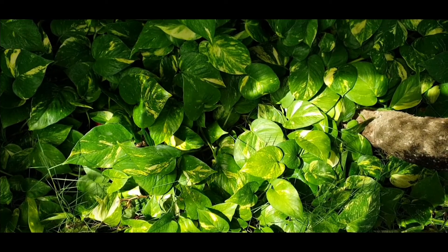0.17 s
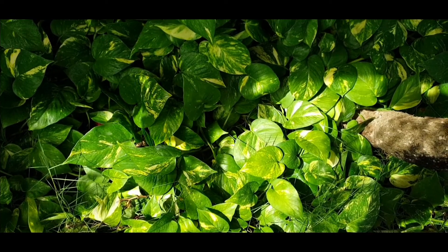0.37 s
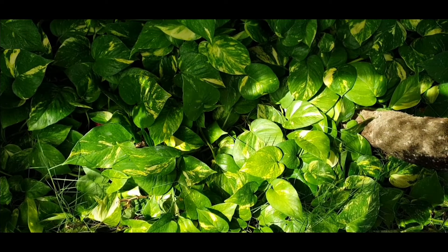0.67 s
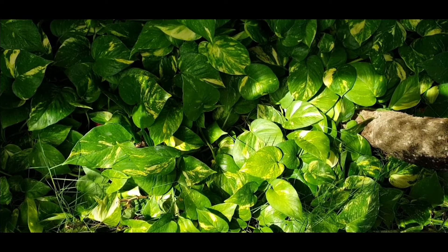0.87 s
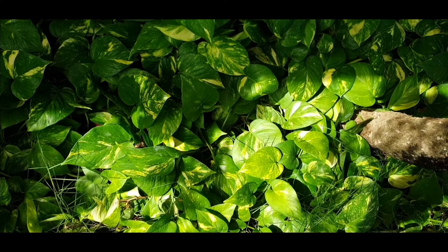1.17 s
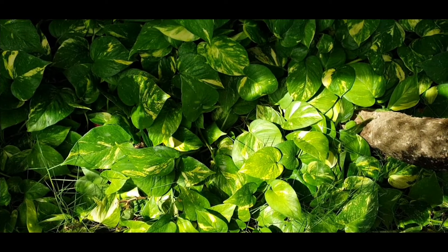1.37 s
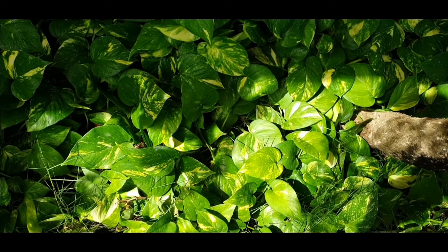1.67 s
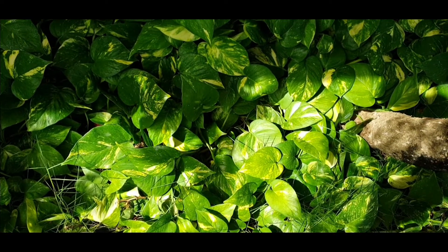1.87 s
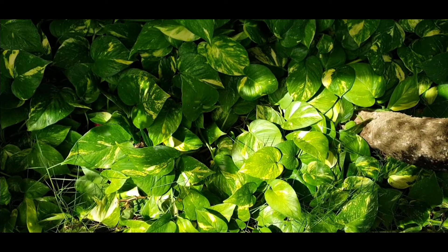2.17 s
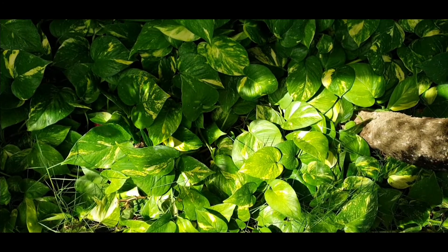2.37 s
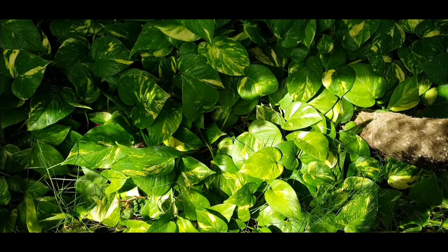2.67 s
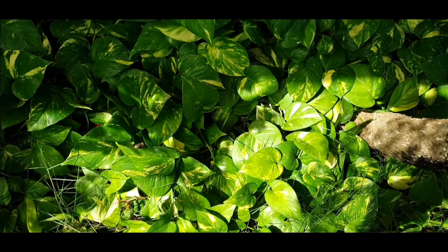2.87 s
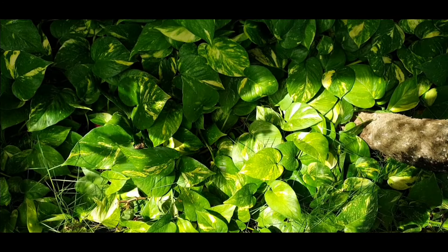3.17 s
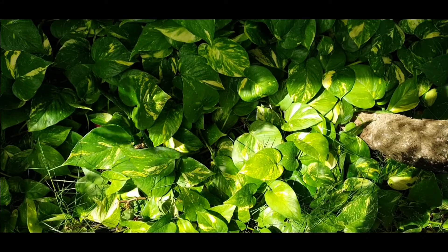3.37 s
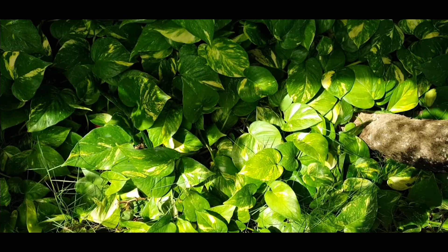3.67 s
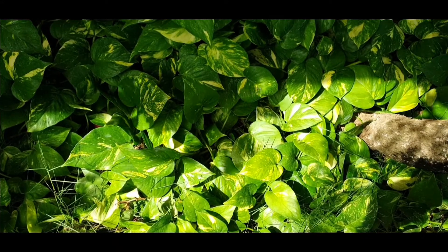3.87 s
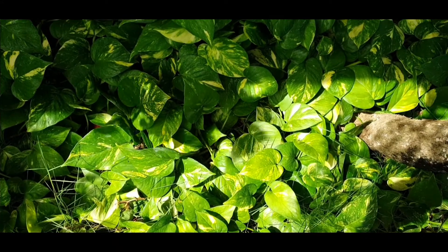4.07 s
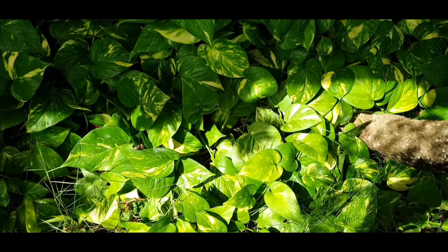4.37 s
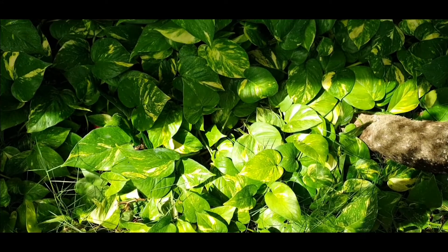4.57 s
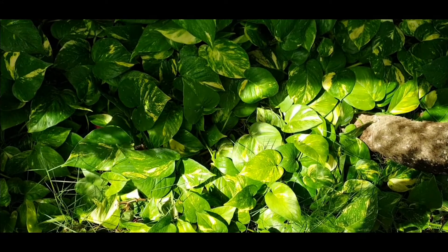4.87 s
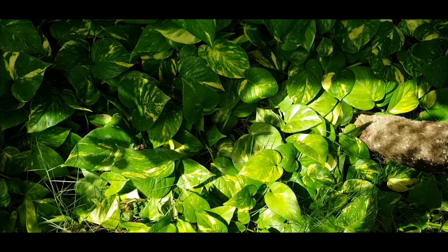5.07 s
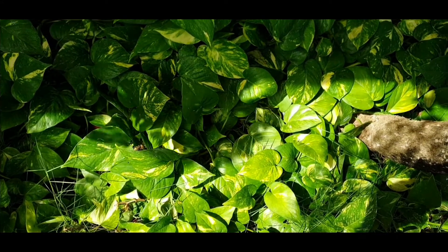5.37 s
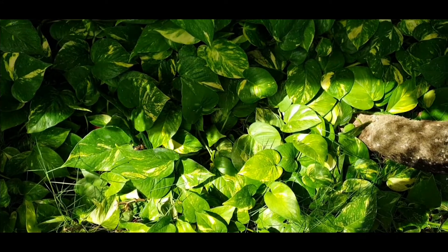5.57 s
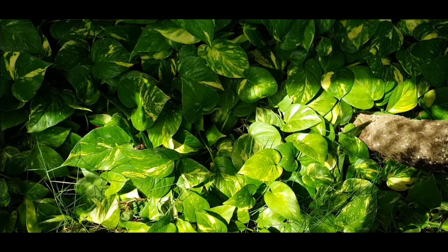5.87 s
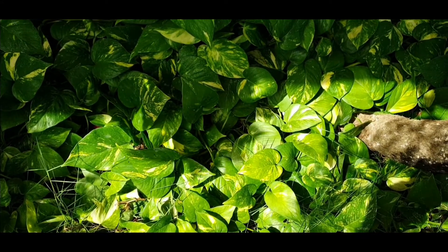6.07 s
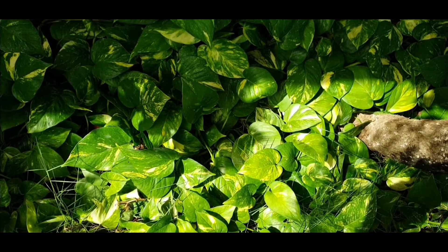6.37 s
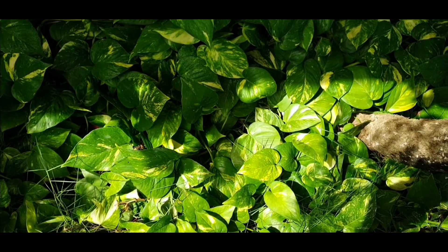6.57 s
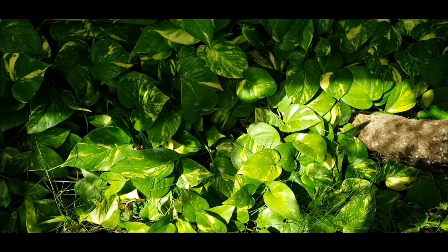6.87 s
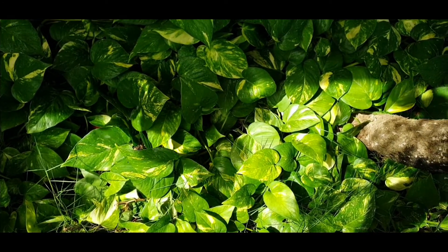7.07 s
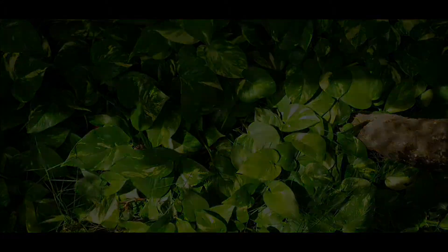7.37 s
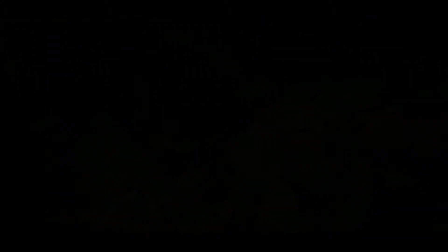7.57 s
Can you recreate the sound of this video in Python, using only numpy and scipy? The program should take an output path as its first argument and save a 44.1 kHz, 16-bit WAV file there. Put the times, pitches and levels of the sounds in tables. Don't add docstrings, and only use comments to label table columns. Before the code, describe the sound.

Close stereo phone pickup in a garden: dense, crisp rustling of broad leaves swells for two seconds, then eases. Far traffic rumbles softly underneath. Sparse small birds whistle, pipe, buzz and twitter among the trees. Wind thumps the left side, lightly at first, then in two heavy bursts with a hard slap just after five seconds, dying away before an abrupt stop.

```python
import sys
import numpy as np
from scipy import signal
from scipy.fft import rfft, irfft, next_fast_len
from scipy.io import wavfile
from scipy.ndimage import uniform_filter1d

SR = 44100
rng = np.random.default_rng(int(sys.argv[2]) if len(sys.argv) > 2 else 0)


def gain_from_decibels(decibels):
    exponent = np.asarray(decibels, float) / 20
    return 10 ** exponent


def bounce(signal):
    frames = np.transpose(np.atleast_2d(signal))
    limited = np.clip(frames, -1, 1)
    pcm = np.round(limited * 32767).astype(np.int16)
    wavfile.write(sys.argv[1], SR, pcm)


N = 340452
T, SIZE = np.arange(N) / SR, next_fast_len(N)
HZ = np.arange(SIZE // 2 + 1) * SR / SIZE + 1
PORT_LAG = 10


def rms_one(x):
    return x / np.sqrt(np.mean(x ** 2))


def spectrum(table):
    hz, value = np.transpose(table)
    return np.interp(np.log(HZ), np.log(hz), value)


def band(x, lo_hz, hi_hz, order=2):
    return signal.sosfilt(signal.butter(order, [lo_hz, hi_hz], "band", fs=SR, output="sos"), x)


def walk(rate_hz):
    hold = max(int(SR / rate_hz), 2)
    held = rng.standard_normal(512)[np.arange(N) // hold % 512]
    return 1.2 * uniform_filter1d(uniform_filter1d(held, hold), hold)


# frequency in Hz, share of the sound common to both (0-1).
COMMON = [(60, 1), (200, 0.9), (400, 1), (700, 0.56), (1000, 0.39), (1900, 0.07), (2600, 0.37),
          (6000, 0.07), (15000, 0.01)]


def two_ports(sources):
    common, left, right = rfft(sources)
    share = np.clip(spectrum(COMMON), 0, 1)
    late = np.exp(-2j * np.pi * HZ * PORT_LAG / SR)
    shared = np.array([common, late * common])
    private = np.array([left, right])
    return np.sqrt(share) * shared + np.sqrt(1 - share) * private


def wavering(spectra, centres_hz, shared_db, own_db, own_rate_hz):
    out = 0
    for k in range(len(centres_hz)):
        this_band = np.arange(len(centres_hz)) == k
        weight = np.interp(np.log(HZ), np.log(centres_hz), this_band)
        level_db = shared_db[k] + own_db * walk(own_rate_hz)
        out = out + gain_from_decibels(level_db) * irfft(spectra * weight, SIZE)[:, :N]
    return out


def draught():
    creep = rms_one(band(rng.standard_normal((2, N)), 27, 77))
    return creep * gain_from_decibels(-55.5 + 3.0 * np.array([walk(6), walk(25.0)]))


# frequency in Hz, level in dB per Hz.
RUMBLE = [(15, -65), (25, -26), (50, -2), (70, 4), (124, 2), (149, -6.5), (233, -5), (335, -10.5),
          (415, -10.5), (649, -11), (717, -9), (998, -21.5), (1300, -13.5), (1690, -46), (2860, -120)]


def rumble():
    far_db, follow = -62, 0.81
    spectra = two_ports(rng.standard_normal((3, SIZE))) * gain_from_decibels(spectrum(RUMBLE))
    centres_hz = 30 * 2.0 ** np.arange(7)
    breeze_db = np.interp(T, *np.transpose(BREEZE)[:2])
    level_db = far_db + follow * (breeze_db - breeze_db.mean())
    mean_db = level_db.mean()
    depth = np.clip((centres_hz / 400) ** 2, 0.05, 1)
    levels_db = [13.0 + mean_db + d * (level_db - mean_db) for d in depth]
    return wavering(spectra / np.std(irfft(spectra, SIZE)), centres_hz, levels_db, 0.9, 6)


# start in seconds, length in seconds, first pitch in Hz, last pitch in Hz, level in dB.
WHISTLER = [(0, 0.036, 2680, 2600, -42), (.033, 0.05, 2500, 2380, -43), (.075, .06, 2450, 2540, -44),
            (3.455, .04, 2760, 2880, -45), (3.478, 0.085, 2880, 2788, -37), (3.54, 0.09, 2793, 2815, -46),
            (7.6, 0.12, 3090, 2960, -43.5), (7.515, 0.13, 2900, 2930, -54), (7.075, .1, 3080, 2860, -49)]
# start and length in seconds, first and last pitch in Hz, level in dB.
PIPER = [(2.99, 0.075, 4865, 4890, -48), (3.05, .075, 4890, 4900, -49), (3.11, .09, 4900, 4900, -49),
         (3.17, .2, 4900, 4895, -54), (6.64, 0.026, 3090, 3100, -51), (6.655, 0.06, 3360, 3150, -52),
         (6.68, .14, 4880, 4890, -59)]
# start and length in seconds, first and last pitch in Hz, level in dB.
BUZZER = [
    (0, .145, 8200, 7600, -45),
    (3.6, .31, 8850, 7500, -43),
    (4.765, .31, 8800, 7780, -44.5),
]
# start and length in seconds, first and last pitch in Hz, level in dB.
TWITTERER = [(6.005, 0.032, 5390, 4900, -49), (6.09, .06, 5220, 5100, -51.5),
             (6.195, 0.057, 5200, 5050, -46), (6.3, 0.075, 5130, 5140, -50),
             (6.07, 0.084, 3200, 3054, -49.5), (6.71, 0.055, 3350, 3180, -54),
             (6.95, 0.12, 3200, 2950, -61), (7.06, 0.101, 3290, 3110, -53.5),
             (7.07, 0.107, 3050, 2875, -53.5), (7.19, 0.076, 2720, 2680, -53.5),
             (7.56, 0.134, 3350, 3160, -54)]
# start and length in seconds, first and last pitch in Hz, level in dB.
SLURRER = [
    (7.518, 0.075, 3560, 3170, -40.5),
    (6.62, 0.035, 3500, 3370, -48),
]
# calls, distance loss in dB, left minus right in dB, throat flutter in Hz,
# pitch swing in Hz, hoarseness in Hz, haste of the glide (1 even, more = falls early and levels out).
VOICES = [
    (WHISTLER, -5.5, 11, 82, 4, 8, 1.6),
    (SLURRER, -5.5, 11, 82, 4, 6, .6),
    (PIPER, -6.5, -12, 54, 3, 3.6, 1.1),
    (BUZZER, -5, 0, 310, 370, 75, 2.0),
    (TWITTERER, -2.5, -12, 75, 160, 90, 1.1),
]


def calls(table, loss_db, pan_db, flutter_hz, swing_hz, hoarse_hz, haste):
    out = np.zeros(N)
    throat_hz = flutter_hz * (1 + 0.0269 * walk(40))
    swing = swing_hz * np.sin(2 * np.pi * np.cumsum(throat_hz) / SR)
    swing += hoarse_hz * walk(60)
    for start, length, first_hz, last_hz, db in table:
        i = int(start * SR)
        u = np.arange(int(length * SR)) / (length * SR)
        hz = last_hz + (first_hz - last_hz) * (1 - u) ** haste + swing[i:i + len(u)]
        breath = np.sin(np.pi * u ** 0.75) ** 0.65
        out[i:i + len(u)] += gain_from_decibels(db) * breath * np.sin(2 * np.pi * np.cumsum(hz) / SR)
    out *= np.sqrt(2) * gain_from_decibels(loss_db + 1.8 * walk(62))
    left, right = out * gain_from_decibels(pan_db / 2), np.roll(out, PORT_LAG + 2) * gain_from_decibels(-pan_db / 2)
    return np.array([left, right])


def birds():
    trees_t60_s, trees_db = 0.3, -1.5
    direct = sum(calls(*voice) for voice in VOICES)
    tail = rng.standard_normal((2, SR // 2)) * gain_from_decibels(-60 * T[:SR // 2] / trees_t60_s)
    tail = gain_from_decibels(trees_db) * tail / np.sqrt(np.sum(tail ** 2, axis=1, keepdims=True))
    return direct + signal.fftconvolve(direct.mean(0, keepdims=True), tail, axes=1)[:, :N]


# time in seconds, peak in dB, pitch in Hz, sign of the push.
SLAPS = [
    (2.976, -19, 200, -1),
    (3.157, -17, 200, 1),
    (3.53, -17, 220, -1),
    (3.932, -18, 170, 1),
    (5.2297, -7, 260, -1),
]


def slaps():
    out = np.zeros(N)
    for s, db, hz, sign in SLAPS:
        u = (np.pi * hz * (T - s)) ** 2
        out += sign * gain_from_decibels(db) * (1 - 2 * u) * np.exp(-u)
    return out


# start in seconds, length in
# seconds, level in dB, sharpness in dB.
LEFT_PUFFS = [(0.003, 0.099, -38.5, -18.5), (0.121, 0.029, -30, -21.5), (0.321, 0.05, -25.5, -26.5),
              (0.378, 0.075, -33.5, -21), (0.497, 0.033, -31.5, -7), (2.084, 0.031, -38, -22),
              (2.27, 0.13, -45.5, -20.5), (2.601, 0.022, -25, -19), (2.634, 0.032, -36, -11),
              (2.697, 0.023, -27.5, -14), (2.826, 0.083, -24.5, -23.5), (2.951, 0.049, -26.5, -10),
              (3.024, 0.021, -20, -19.5), (3.068, 0.031, -24.5, -6.5), (3.11, 0.021, -28.5, -18.5),
              (3.139, 0.044, -29, -2.5), (3.205, 0.035, -25, -23), (3.245, 0.1, -26, -7),
              (3.368, 0.026, -26.5, -25.5), (3.406, 0.028, -19.5, -20.5), (3.455, 0.034, -23.5, -23.5),
              (3.509, 0.048, -23.5, -5), (3.58, 0.093, -33, -3.5), (3.705, 0.024, -31, -24.5),
              (3.764, 0.074, -34.5, -4.5), (3.826, 0.038, -26, -6), (3.893, 0.024, -23.5, -15),
              (3.922, 0.021, -22.5, -2),
              (4.407, 0.015, -27, -11), (4.769, 0.022, -26, -7), (4.795, 0.058, -31.5, -21),
               (4.883, 0.097, -35.5, -21), (5.137, 0.03, -23, -15), (5.174, 0.044, -25, -9),
               (5.222, 0.047, -21.5, -5), (5.269, 0.027, -26, 1), (5.343, 0.021, -38.5, -6),
               (5.4, 0.055, -26, -16), (5.535, 0.024, -35, 0.5), (5.64, 0.058, -22.5, -15),
               (5.715, 0.05, -19.5, -18), (5.77, 0.049, -24, -15), (5.856, 0.038, -25, -12),
               (5.913, 0.025, -19.5, -9.5), (5.973, 0.027, -23, -17.5), (6.011, 0.064, -32.5, -7),
               (6.077, 0.04, -27.5, -20), (6.131, 0.03, -24, -20.5), (6.19, 0.062, -17.5, -11),
               (6.272, 0.034, -33, -19.5), (6.318, 0.17, -35.5, -20), (6.464, 0.047, -34, -23.5),
               (6.532, 0.024, -28.5, -26.5), (6.838, .06, -42.5, -17.5), (6.998, 0.07, -30, -29.5),
               (7.127, 0.043, -38, -20)]
# start and length in seconds, level and sharpness in dB.
RIGHT_PUFFS = [
    (3.198, 0.043, -31, -25),
    (3.279, 0.04, -30, -31),
    (4.563, 0.022, -37, -19.5),
    (4.603, 0.081, -34.5, -16),
]


def eddies(puffs):
    start, length, level_db, flutter_db = np.transpose(puffs)
    hz = 73.85 * 2 ** (0.0042 * (flutter_db + 16))
    swirl_power, flutter_power = np.zeros(N), np.zeros(N)
    for mid, half, db, fine_db in zip(start + length / 2, length / 2, level_db, flutter_db):
        near = slice(max(int((mid - 3 * half) * SR), 0), int((mid + 3 * half) * SR))
        shape = np.exp(-1.5 * np.abs((T[near] - mid) / half) ** 3.5)
        shape += gain_from_decibels(-30.0) * np.exp(-((T[near] - mid + half) / half) ** 2)
        swirl_power[near] += shape * gain_from_decibels(2 * db)
        flutter_power[near] += shape * gain_from_decibels(2 * (db + fine_db))
    turning_hz = np.interp(T, start + length / 2, hz) * np.exp(0.24 * walk(55))
    turn = 2 * np.pi * np.cumsum(turning_hz) / SR
    crest = 0.25 * walk(25) * np.cos(2 * turn)
    swirl = np.sqrt(2) * (np.sin(turn) + crest) * gain_from_decibels(1.4 * walk(45))
    heave = gain_from_decibels(-5.5) * rms_one(band(rng.standard_normal(N), 28.5, 62))
    flutter = rms_one(band(rng.standard_normal(N), 100, 208)) * gain_from_decibels(4.3 * walk(48) - 1.0)
    return np.sqrt(swirl_power) * (swirl + heave) + np.sqrt(flutter_power) * flutter


def wind():
    thumps = np.array([eddies(LEFT_PUFFS) + slaps(), eddies(RIGHT_PUFFS)])
    return signal.sosfilt(signal.butter(2, 33, "high", fs=SR, output="sos"), thumps)


# time in seconds, rustle level in dB, crispness as treble lift in dB.
BREEZE = [(0.2, -48.5, -2), (1.0, -46, -0.5), (1.74, -43.5, 1), (2.2, -47.5, -0.5), (2.77, -49.5, -1.5),
          (3.26, -50.5, 0), (3.85, -48, 0), (4.12, -50.5, -0.5), (5.1, -49.5, 0), (6.2, -50, -0.4),
          (6.45, -51, 0.7), (7.37, -54, -1), (7.6, -54, -3.5)]
# time in seconds, change in dB.
STIRS = [(0.072, 2.5), (0.207, 1), (0.374, -1), (0.968, -0.5), (1.31, -0.2), (1.423, -1.8), (1.609, 2.5),
         (1.763, 1.5), (2.192, 2), (2.85, 0.5), (3.7, 0.5), (4.034, 1.5), (5.16, 1.7), (5.414, -0.5),
         (5.682, -0.5), (5.792, -1.5), (6.265, 2), (6.954, 1.3)]
# frequency in Hz, level in dB per Hz.
LEFT_PORT = [(700, -4.5), (1000, -8), (1400, -6.5), (2100, -7.5), (2700, -6), (3500, -8), (4700, -9.5),
             (5700, -8), (7300, -9.5), (8200, -10), (9000, -21), (10000, -27), (11800, -22.5),
             (15500, -32.5)]
# frequency in Hz, level in dB per Hz.
RIGHT_PORT = [(700, -6), (1000, -5.5), (1400, -3.5), (2100, -4), (2700, 0.5), (3500, 2), (4700, -0.07),
              (5700, -4.5), (7300, -4.5), (8200, -13), (9000, -23), (10000, -16.5), (11800, -13),
              (15500, -16.5)]


def leaves():
    stir_s, restless_db = 0.022, 0.23
    s, level_db, crisp_db = np.transpose(BREEZE)
    level, crisp = np.interp(T, s, level_db), np.interp(T, s, crisp_db)
    contacts = rng.standard_normal((3, SIZE)) * gain_from_decibels(2.0 * rng.exponential(size=(3, SIZE)))
    low_cut = HZ ** 4 / (HZ ** 4 + 873.0 ** 4)
    colour = gain_from_decibels([spectrum(LEFT_PORT), spectrum(RIGHT_PORT)]) * low_cut
    shiver = 0.24 * walk(30) + restless_db * walk(12)
    for mid, db in STIRS:
        near = slice(max(int((mid - stir_s) * SR), 0), int((mid + stir_s) * SR))
        shiver[near] += 1.3 * db * np.cos(np.pi / 2 * (T[near] - mid) / stir_s) ** 2
    glint = 1.3 * walk(30)
    centres_hz = 700 * 2 ** (np.arange(10) / 2)
    shared_db = []
    for hz in centres_hz:
        treble = np.clip(np.log2(hz / 5000), -0.4, 1) * (crisp + glint)
        shared_db.append(level + treble + (hz / 5000) ** 0.42 * shiver)
    spectra = two_ports(contacts) * colour
    main_band = band(irfft(spectra.mean(0), SIZE), 3700, 7000, order=4)
    scale = np.sqrt(np.mean(main_band ** 2))
    pan_db = 1.1 * walk(2.564)
    rustle = wavering(spectra / scale, centres_hz, shared_db, 0.32, 11)
    return rustle * gain_from_decibels(np.array([pan_db, -pan_db]) / 2)


def scene():
    return leaves() + rumble() + birds() + wind() + draught()


# low edge in Hz, high edge in Hz.
DUCKING = [
    (7500, 8400),
    (5800, 6700),
    (8850, 9800),
]


def duck_weak_band(x):
    excess_db = 4
    spectra = rfft(x, SIZE)
    tone, beside, weak = (irfft(spectra * ((HZ > lo) & (HZ < hi)), SIZE)[:, :N] for lo, hi in DUCKING)
    tone_power = uniform_filter1d(np.sum(tone ** 2, axis=0), size=2048)
    beside_power = uniform_filter1d(np.sum(beside ** 2, axis=0), size=16384)
    is_ducked = tone_power > gain_from_decibels(2 * excess_db) * beside_power
    return x - uniform_filter1d(1.0 * is_ducked, size=512) * weak


def band_limit(x):
    return signal.sosfilt(signal.butter(12, 15790, fs=SR, output="sos"), x)


def record(dry):
    stop_s, fade_s, remnant_s = 7.677, 0.0005, 0.0027
    after = np.clip(T - stop_s, 0, None)
    stop = 0.89 * np.exp(-after / fade_s) + 0.077 * np.exp(-(after / remnant_s) ** 2)
    top_cut = signal.ellip(10, 0.2, 70, 15800, fs=SR, output="sos")
    mix = signal.sosfilt(top_cut, duck_weak_band(dry) * stop)
    return band_limit(mix)


dry = scene()
out = record(dry)
bounce(out)
```